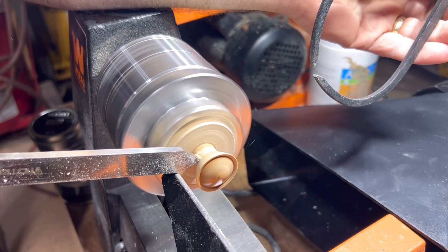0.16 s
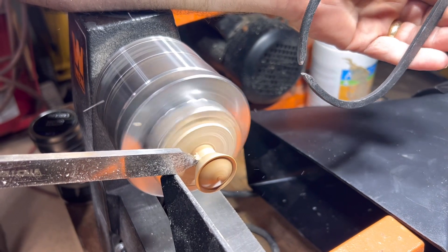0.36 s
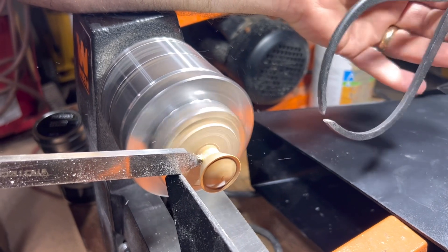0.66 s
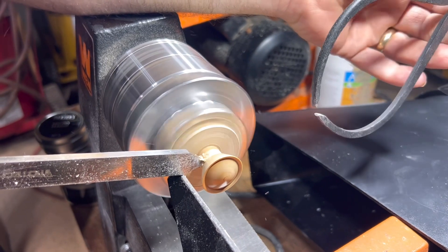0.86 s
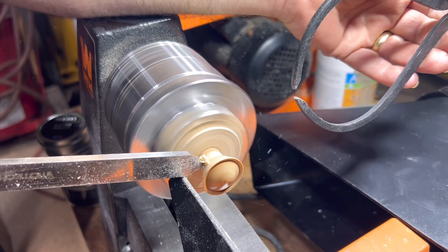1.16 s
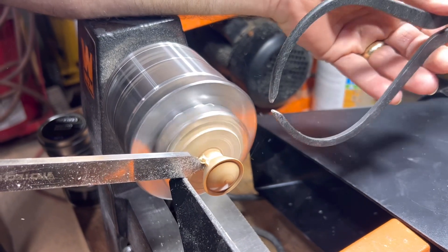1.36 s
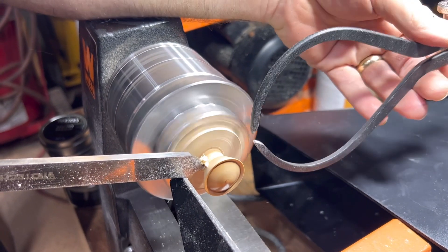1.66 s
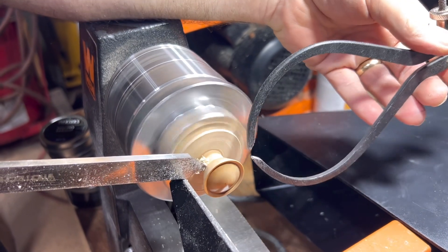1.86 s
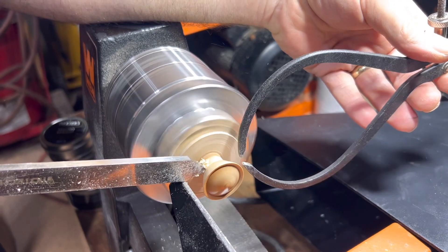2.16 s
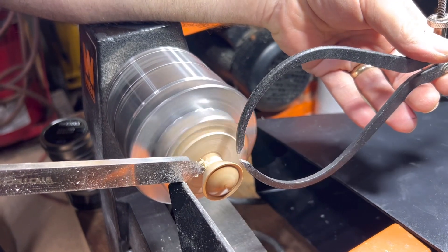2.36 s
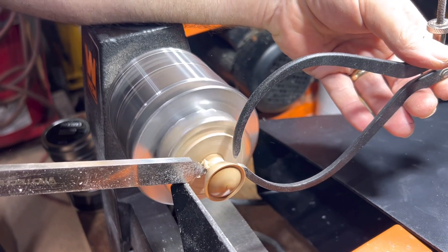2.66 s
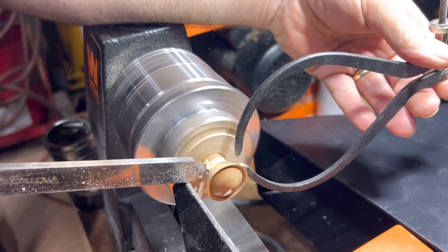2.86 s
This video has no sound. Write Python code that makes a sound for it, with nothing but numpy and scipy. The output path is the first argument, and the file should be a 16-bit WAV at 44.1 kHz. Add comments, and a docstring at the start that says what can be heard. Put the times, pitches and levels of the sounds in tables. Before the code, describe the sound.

High, fluttering squeal and scrape of a chisel cutting wood on a humming lathe.

```python
"""A wood lathe spins a small workpiece at about 47 turns a second against a steel tool, in a small workshop.
From the start the same surface passes the edge on every turn: it scrapes, and hard spots make the steel
chirp in a fluttering squeal, while the motor whines and the machine rumbles underneath.
A low hum swells twice in the first second or so, and the rasp eases as the steel rings on.
Near 1.8 s the tool bites again and the squeal sharpens; at the very end a deeper hum rises."""
import sys
import numpy as np
from scipy import signal
from scipy.fft import rfft, irfft
from scipy.io import wavfile
from scipy.ndimage import uniform_filter1d

SR = 44100
rng = np.random.default_rng(int(sys.argv[2]) if len(sys.argv) > 2 else 0)


def transcribe(u):
    """Save the signal u as a 16-bit wav file named by the first command-line argument.

    u: samples, shape (n,) or (channels, n), limited to [-1, 1]; the rate is SR.
    q: integer samples, one column per channel.
    """
    v = np.clip(np.atleast_2d(u).T, -1, 1)
    q = np.round(v * 32767).astype(np.int16)
    wavfile.write(sys.argv[1], SR, q)


N = 132300
TIME_S = np.arange(N) / SR

# spindle speed: time_s, turns_per_s
SPINDLE_SPEED = [(0, 47.3), (.3, 47.1), (.6, 46.92), (1, 46.76), (1.35, 46.73), (1.8, 46.87), (2.45, 46.92),
                 (3, 46.86)]
DRIVE_RATIO = .29395  # rounds of the drive per spindle turn


def squeal(turns, surge):
    """Each hard spot swells a mode of the steel once a turn and leaves it ringing."""
    # modes of the tool, by name: pitch_hz, pan_db, left_lead_rad, early_detune_hz, settle_s
    steel_modes = {"low": (3252, 13.5, 1.37, -5, 1), "middle": (4215, 0.4, 0.84, 44, 1.78),
                   "high": (4865, 6.5, 1.02, 115, 0.58), "upper": (5634, 3, 1.5, 0, 1),
                   "top": (6063, 4, 0, 3, 1)}
    # hard spots on the wood: mode, place_turns, half_width_turns, level_db, start_s, end_s
    hard_spots = [("middle", 0.025, 0.041, -13, 1.76, 3.07), ("middle", 0.021, 0.043, -18, 0.091, 0.91),
                  ("middle", 0.019, 0.021, -28, 0.69, 1.7), ("middle", -0.26, .05, -20, -.2, 0.57),
                  ("middle", -.12, 0.026, -17, -.2, 0.64), ("middle", -0.064, 0.06, -18, 0.74, 1.5),
                  ("middle", -0.06, 0.05, -24.5, 1.5, 3.5), ("middle", -0.16, 0.029, -20, 1.2, 2.9),
                  ("middle", 0.46, 0.067, -20.5, 0.72, 1.71), ("middle", 0.4, .055, -23.5, 1.56, 3.2),
                  ("middle", 0.52, 0.035, -19, 2.27, 3.9), ("middle", 0.484, 0.023, -25.5, 0.68, 2.34),
                  ("middle", 0.14, 0.02, -27, .8, 1.3), ("high", 0, 0.051, -23, -.2, 0.53),
                  ("high", -0.034, 0.068, -16.5, .52, 1.8), ("high", -.045, 0.063, -15.5, 1.76, 3.05),
                  ("high", .1, 0.052, -20.5, .85, 2.93), ("high", 0.16, .04, -34, -.2, 2.9),
                  ("high", 0.545, 0.052, -28.5, -.2, 2.7), ("low", -0.04, 0.056, -29.5, -.2, 1.57),
                  ("low", -0.025, .07, -31, 1.5, 3.2), ("upper", 0.45, 0.073, -30.5, 0.9, 3.6),
                  ("top", 0.38, .07, -29, 0.42, 1.3)]
    # the squeal eases before the tool bites again: time_s, gain_db
    squeal_level = [(0, -.5), (.4, 1.5), (.72, -1.5), (1, 0.5), (1.5, -2), (1.9, -0.5), (2.5, .5), (3, -1)]
    fade_s, ring_db, ring_decay_turns, surge_db = .094, -16.5, .12, .3
    mean_speed = curve(SPINDLE_SPEED).mean()
    # spots on one mode share its slowly drifting phase
    drift_rad = {mode: 2 * np.pi * rng.random() + .19 * walk(2.55) for mode in steel_modes}
    scatter_db = .6 + .9 * np.exp(-TIME_S / .8)  # more uneven until the cut steadies
    out = 0
    for mode, place, width, level_db, start_s, end_s in hard_spots:
        pitch_hz, pan_db, lead_rad, detune_hz, settle_s = steel_modes[mode]
        pitch_hz = pitch_hz + detune_hz * (1 - np.tanh((TIME_S - settle_s) / fade_s / 2)) / 2
        past_spot = (turns - place + 1 / 3) % 1 - 1 / 3  # in turns, negative on the approach
        contact = (np.tanh((TIME_S - start_s) / fade_s) - np.tanh((TIME_S - end_s) / fade_s)) / 2
        swell = np.exp(-.5 * (past_spot / width) ** 2)
        tail = undb(ring_db) * (past_spot > 0) * (1 - swell) * np.exp(-np.abs(past_spot) / ring_decay_turns)
        gain = undb(level_db + scatter_db * walk(60) + surge_db * surge)
        jitter_rad = .2 * walk(300)
        phase = 2 * np.pi * pitch_hz * (place + past_spot) / mean_speed + drift_rad[mode] + jitter_rad
        out = out + contact * (swell + tail) * gain * tone(phase, pan_db, lead_rad)
    return out * undb(curve(squeal_level))


def scraping(turns):
    """The edge rasps on the wood under a fine, fading hiss; its pressure varies a little once a turn."""
    # colours of the rasp and the hiss: frequency_hz, gain_db
    rasp_spectrum = [(1900, -29.5), (2300, -16), (2600, -12), (2770, -7.5), (2980, -13.5), (3250, -9),
                     (3800, -10.5), (4020, -4.5), (4230, 0.5), (4600, -2), (4900, -2.5), (5200, -12.5),
                     (5700, -9), (6300, -10.5), (7100, -20), (8500, -22)]
    hiss_spectrum = [(2000, -9), (5000, 0), (7200, 0), (7850, 4.5), (8600, 4), (9300, -7), (10400, -8),
                     (11200, -2), (12100, -2), (12800, -8), (13700, -7), (14800, 0), (15700, 2)]
    # the rasp eases as the steel starts to ring, then returns: time_s, gain_db
    rasp_level = [(0, 1.5), (.5, 1.5), (1.1, 0.5), (1.5, 0), (2.2, -1), (3, 1)]
    pressure = np.cos(2 * np.pi * turns)
    rasp = rubbing(turns, rasp_spectrum, -27.5 + curve(rasp_level), fresh=.33, side_db=-3.5, pan_db=2.5)
    hiss = rubbing(turns, hiss_spectrum, -35 - 1.28 * TIME_S, fresh=.89, side_db=-2.5, pan_db=.3)
    flicker_db = .83 * walk(18)
    return rasp * undb(-.1 * pressure) + hiss * undb(.44 * pressure + flicker_db)


def ringing(turns):
    """Scraping keeps thin resonances of tool and rest ringing; a high sizzle comes and goes."""
    # resonances of tool and rest: pitch_hz, width_hz, level_db
    tool_rings = [(2565, 18, -48.5), (2784, 36, -44.5), (3320, 39, -51), (3470, 31, -50), (3873, 25, -48),
                  (5660, 85, -44), (6030, 170, -46), (6730, 83, -48)]
    # sizzle of the edge: time_s, level_db
    sizzle_level = [(0, -46), (.6, -46.5), (1.25, -48), (1.45, -45.5), (1.75, -45), (2, -50), (2.5, -48.5),
                    (3, -46)]
    rings = sum(resonance(turns, *ring, fresh=.2) for ring in tool_rings)
    sizzle = resonance(turns, pitch_hz=11400, width_hz=230, level_db=curve(sizzle_level), fresh=.89)
    return rings + sizzle


def machine_rumble(turns):
    """The running machine rumbles steadily, with a low shudder that swells and sinks."""
    # colours of the rumble and the shudder: frequency_hz, gain_db
    rumble_spectrum = [(25, -21), (45, -32), (70, -6), (115, -8), (155, 8), (200, -5.5), (330, -3.5),
                       (480, -10), (780, -8), (1040, -3.5), (1150, -4.5), (1230, -3), (1350, 0),
                       (1480, -8.5), (1950, -16), (2600, -5), (5000, -56)]
    shudder_spectrum = [(125, -23), (155, 5), (200, -6), (330, 2), (460, -4), (600, -2.5), (800, -9)]
    # swells of the shudder: time_s, level_db
    shudder_level = [(0, -48.5), (.4, -42), (.7, -47.5), (1, -41.5), (1.3, -48), (1.6, -49), (2.5, -63),
                     (3, -44)]
    rumble = rubbing(turns, rumble_spectrum, -38.5, fresh=.78, side_db=1, pan_db=-.5)
    shudder = rubbing(turns, shudder_spectrum, curve(shudder_level), fresh=.9, side_db=1, pan_db=-.5)
    return rumble + shudder


def motor_whine(turns):
    """Wavering tones follow the speed of the drive, some louder at first."""
    # drive tones: cycles_per_round, level_db, pan_db, left_lead_rad, early_boost_db
    drive_tones = [(21.85, -49, -3, 0, 0), (33.4, -54, 0, 0, 0), (44.1, -56, 0, 0, 3), (47.6, -55, 0, 0, 3),
                   (61.3, -57, 0, 0, 2), (64, -47, 2, -.7, 6), (71.9, -48.5, 0, -.8, 0),
                   (80, -40, 0, -1, 0), (81.6, -49, 0, -1, 0), (83.4, -53, 0, -1, 0),
                   (92.9, -45.5, 1, -1.1, 2), (97.2, -46.5, 0, -1.4, 3), (98.5, -52, 0, -1.4, 4)]
    early = np.exp(-TIME_S / .59)
    out = 0
    for multiple, level_db, pan_db, lead_rad, boost_db in drive_tones:
        phase = 2 * np.pi * (multiple * DRIVE_RATIO * turns + rng.random()) + .19 * walk(39.96)
        gain = np.sqrt(2) * undb(level_db + boost_db * early + 1.5 * walk(50.02))
        out = out + gain * tone(phase, pan_db, lead_rad)
    return out


def spindle_tones(turns):
    """Harmonics locked to the spindle, each wavering slowly in level."""
    # spindle harmonics: cycles_per_turn, level_db
    harmonics = [(1, -55), (3, -55), (5, -59), (6, -57), (8, -58), (12, -57), (14, -56), (46, -57),
                 (50, -55), (55, -51), (59, -46), (68, -53), (69, -51), (86, -41), (89, -42), (94, -44),
                 (102, -40), (104, -37)]
    lift_db, waver_db = .5, 1.1
    out = 0
    for multiple, level_db in harmonics:
        gain = np.sqrt(2) * undb(level_db + lift_db + waver_db * walk(5.87))
        out = out + gain * np.sin(2 * np.pi * (multiple * turns + rng.random()))
    return out


def hums(turns):
    """A low resonance swells twice into a hum; later a deeper one rises at six times the spindle speed."""
    # swells of the two hums: time_s, level_db
    early_level = [(0, -43), (.24, -45.5), (.32, -36.5), (.5, -36.5), (.6, -41), (.8, -47), (.89, -34),
                   (1.06, -34.5), (1.11, -43), (1.5, -98), (3, -88)]
    late_level = [(2.4, -82), (2.72, -51), (2.9, -43), (3, -47)]
    early_hz, mean_speed = 322.7, curve(SPINDLE_SPEED).mean()
    early = undb(curve(early_level)) * tone(2 * np.pi * early_hz * turns / mean_speed, pan_db=-6)
    late = undb(curve(late_level)) * tone(2 * np.pi * 6 * turns, pan_db=-6)
    return np.sqrt(2) * (early + late)


def spindle():
    """The drive hurries the spindle once a round: angle in turns with and without that, and the surge."""
    zero_angle_s, surge_peak_s, surge_turns_per_s = 2.403, 2.335, .16
    smooth = np.cumsum(curve(SPINDLE_SPEED)) / SR
    smooth = smooth - np.interp(zero_angle_s, TIME_S, smooth)
    surge = np.cos(2 * np.pi * DRIVE_RATIO * (smooth - np.interp(surge_peak_s, TIME_S, smooth)))
    return smooth + np.cumsum(surge_turns_per_s * surge) / SR, smooth, surge


def surface(turns, fresh):
    """Roughness that comes round every turn and slowly wears; the share `fresh` never repeats."""
    size, wear_s = 8192, 1.17
    place = turns % 1 * size
    repeating = np.zeros(N)
    for stage, phases in enumerate(rng.uniform(0, 2 * np.pi, (8, 360))):
        profile = irfft(np.exp(1j * phases), size)
        active = np.abs(TIME_S / wear_s - stage) < 1
        crossfade = np.cos(np.pi / 2 * (TIME_S[active] / wear_s - stage))
        repeating[active] += crossfade * np.interp(place[active], np.arange(size), profile / profile.std())
    return np.sqrt(1 - fresh) * repeating + np.sqrt(fresh) * rng.standard_normal(N)


def rubbing(turns, spectrum, level_db, fresh, side_db, pan_db):
    """A turning surface heard through a body; the stereo image narrows below 384 Hz."""
    mid, side = (colour(surface(turns, fresh), spectrum) for _ in range(2))
    side = signal.sosfilt(signal.butter(2, 384, "high", fs=SR, output="sos"), side)
    return undb(level_db) * pan(pan_db) * (mid + undb(side_db) * side * np.array([[1], [-1]]))


def resonance(turns, pitch_hz, width_hz, level_db, fresh):
    """The turning surface heard through one narrow resonance."""
    hz = pitch_hz + width_hz * np.linspace(-4, 4, 33)
    gain_db = -20 * np.log10(1 + ((hz - pitch_hz) / width_hz) ** 2 * 2)
    return rubbing(turns, np.column_stack([hz, gain_db]), level_db, fresh, side_db=-3.5, pan_db=.3)


def colour(x, points):
    """EQ through (frequency_hz, gain_db) points, rolled off past both ends and scaled to rms 1."""
    hz, db = np.array(points).T
    f = np.maximum(np.fft.rfftfreq(N, 1 / SR), 1)
    skirts = np.minimum(f / hz[0], 1) ** 2 * np.minimum(hz[-1] / f, 1) ** 4
    gain = undb(np.interp(np.log(f), np.log(hz), db))
    y = irfft(rfft(x) * gain * skirts, N)
    return y / y.std()


def tone(phase, pan_db, lead_rad=0):
    """A sine placed in stereo by level and by the phase lead of the left side."""
    return pan(pan_db) * np.sin(phase + np.array([[lead_rad], [-lead_rad]]) / 2)


def pan(db):
    """Stereo gains, the left `db` above the right."""
    return undb(np.array([[db], [-db]]) / 2)


def walk(rate_hz):
    """Smooth random wobble with a spread of 1."""
    hold = int(SR / rate_hz)
    steps = np.repeat(rng.standard_normal(N // hold + 2), hold)
    y = uniform_filter1d(uniform_filter1d(steps, hold), hold)[:N]
    return y / y.std()


def curve(points):
    """Straight lines through (time_s, value) points."""
    return np.interp(TIME_S, *np.array(points).T)


def undb(db):
    """Decibels to gain."""
    return 10 ** (np.asarray(db) / 20)


def scene():
    """Tool in front, machine behind, all following the one spindle."""
    turns, smooth, surge = spindle()
    tool = squeal(turns, surge) + scraping(turns) + ringing(turns)
    machine = machine_rumble(smooth) + motor_whine(smooth) + spindle_tones(smooth) + hums(smooth)
    return tool + machine


def record(dry):
    """A steep low-pass takes off the air above 15750 Hz."""
    return signal.sosfilt(signal.ellip(10, .1, 80, 15750, fs=SR, output="sos"), dry)


dry = scene()
out = record(dry)
transcribe(out)
```